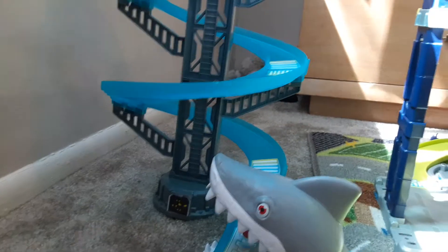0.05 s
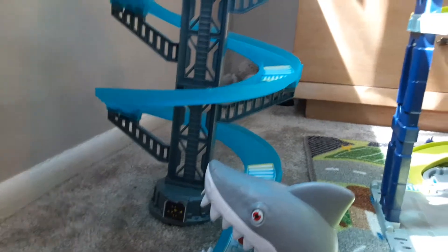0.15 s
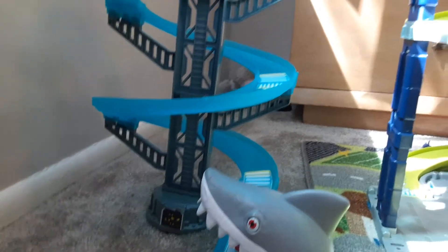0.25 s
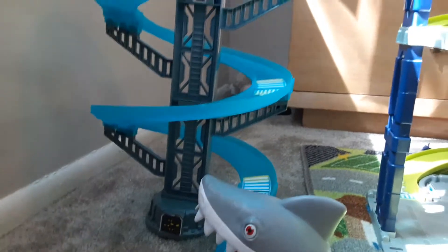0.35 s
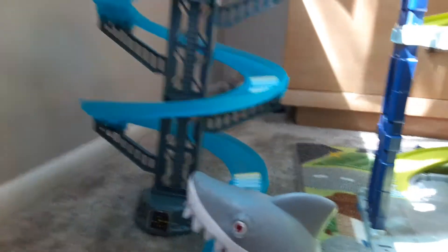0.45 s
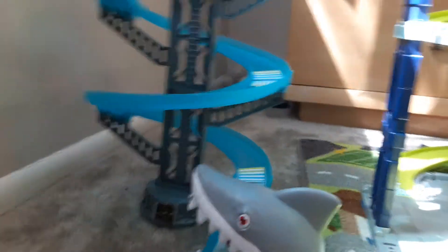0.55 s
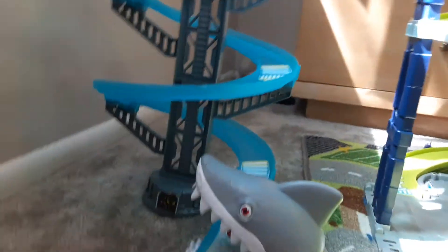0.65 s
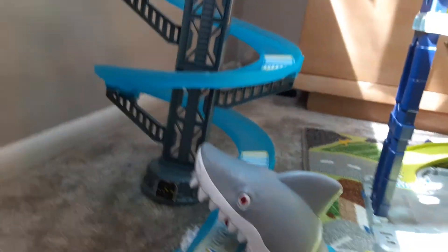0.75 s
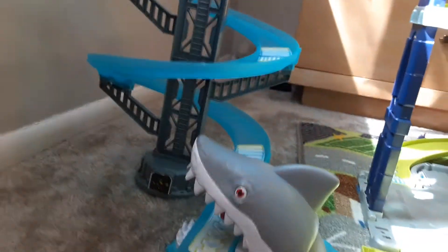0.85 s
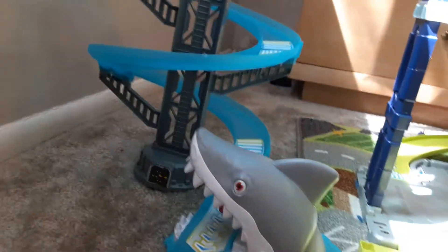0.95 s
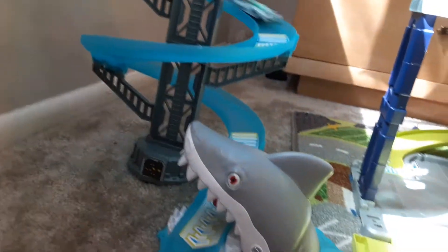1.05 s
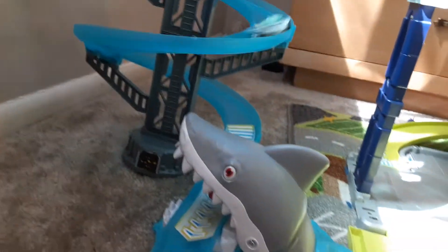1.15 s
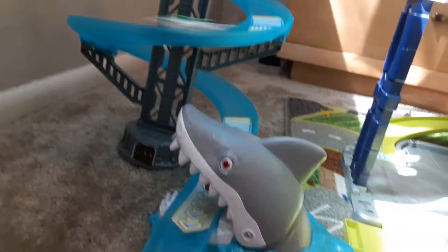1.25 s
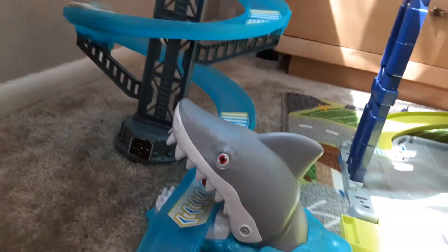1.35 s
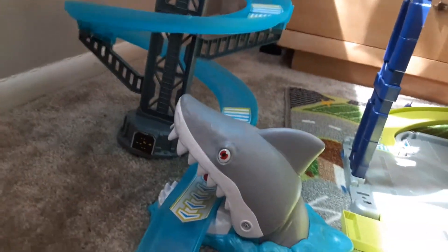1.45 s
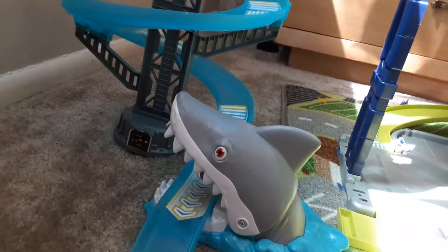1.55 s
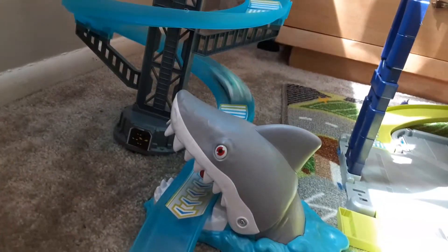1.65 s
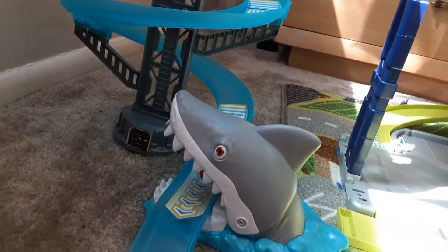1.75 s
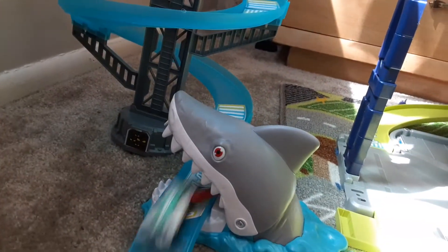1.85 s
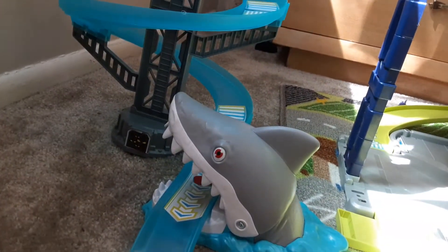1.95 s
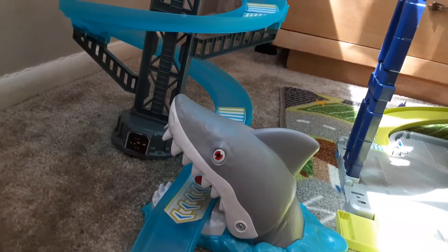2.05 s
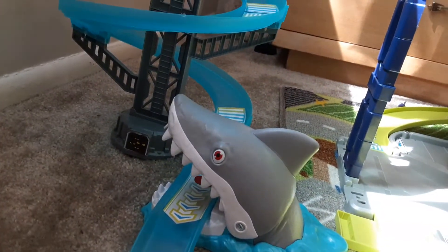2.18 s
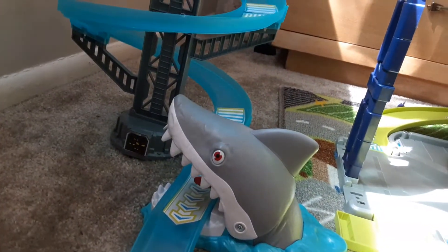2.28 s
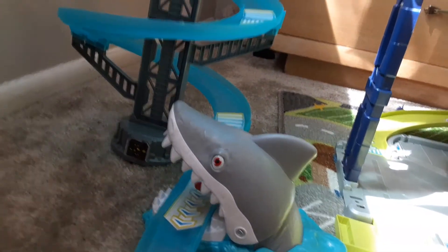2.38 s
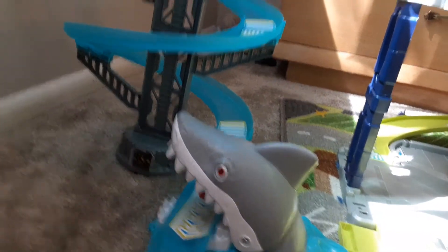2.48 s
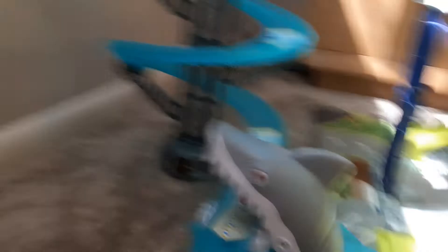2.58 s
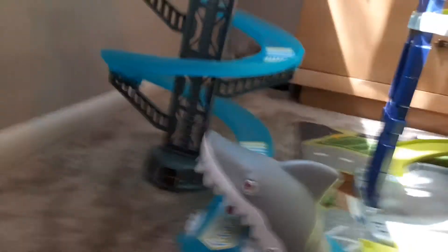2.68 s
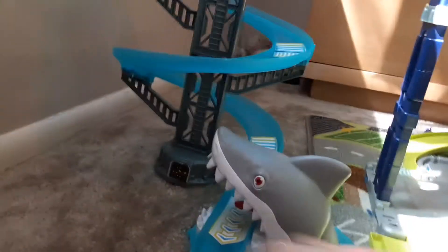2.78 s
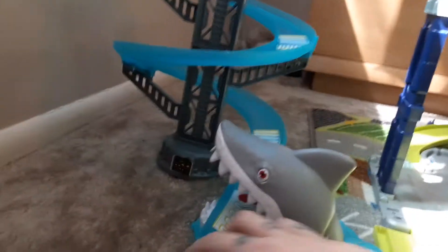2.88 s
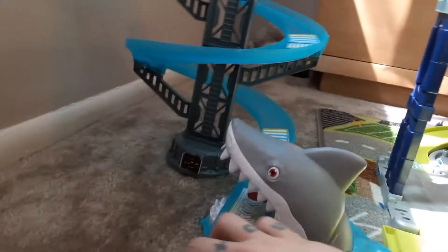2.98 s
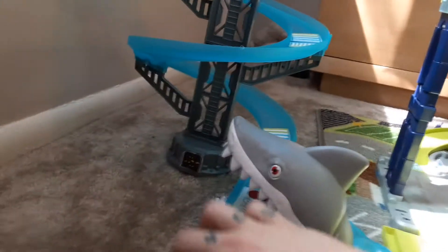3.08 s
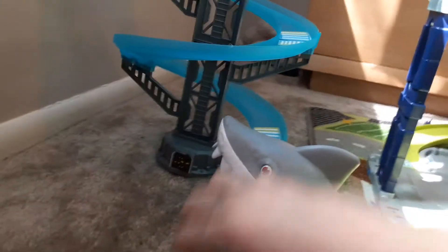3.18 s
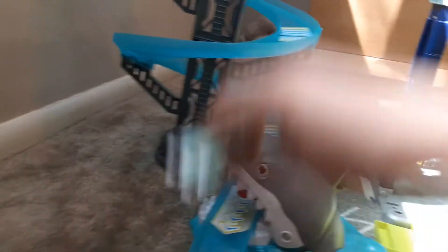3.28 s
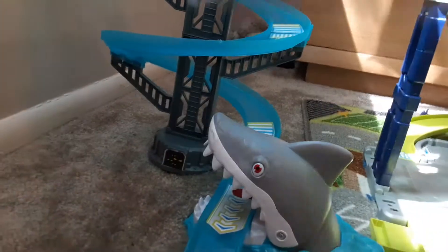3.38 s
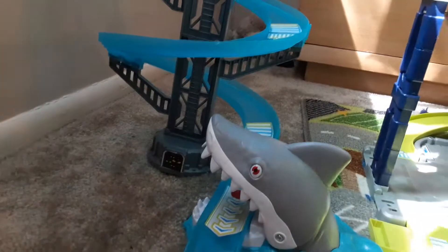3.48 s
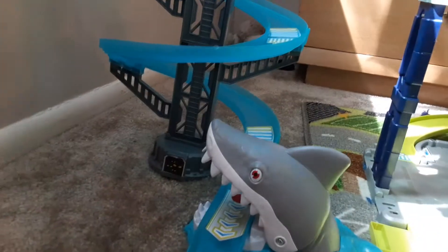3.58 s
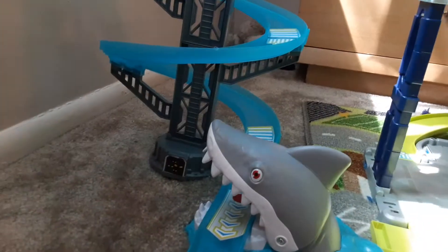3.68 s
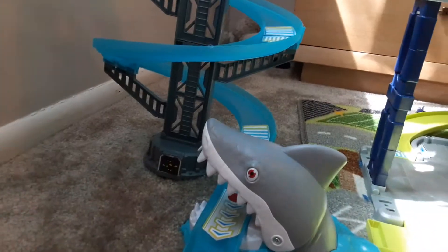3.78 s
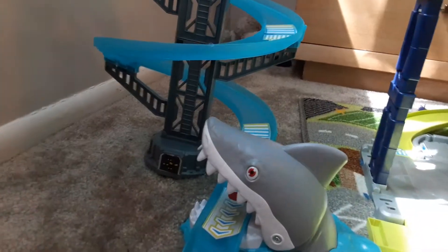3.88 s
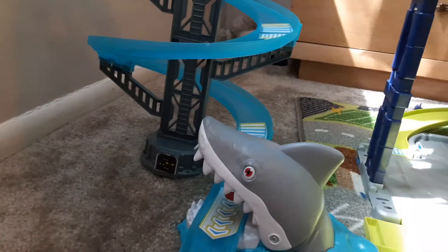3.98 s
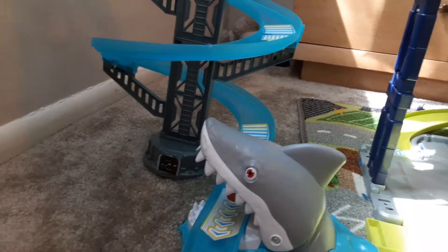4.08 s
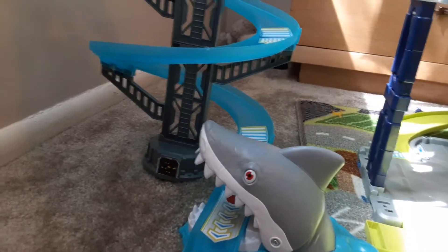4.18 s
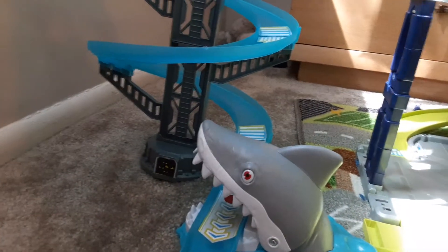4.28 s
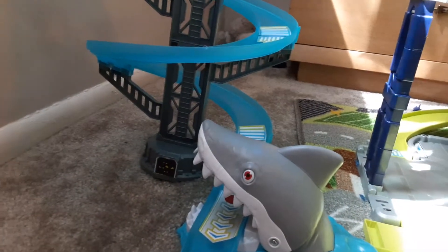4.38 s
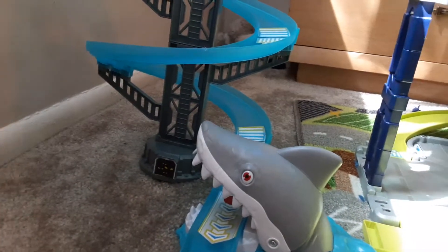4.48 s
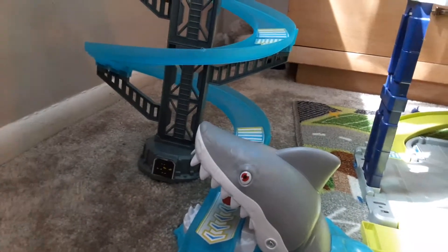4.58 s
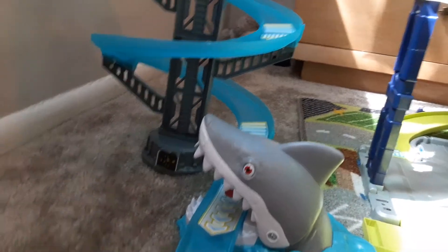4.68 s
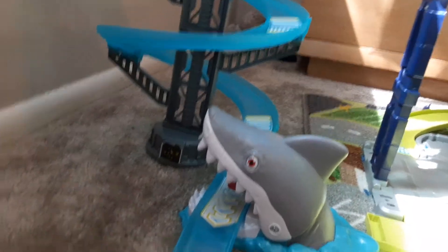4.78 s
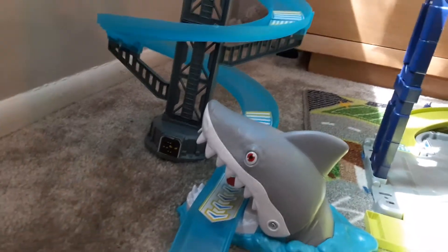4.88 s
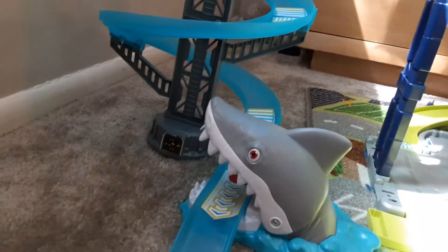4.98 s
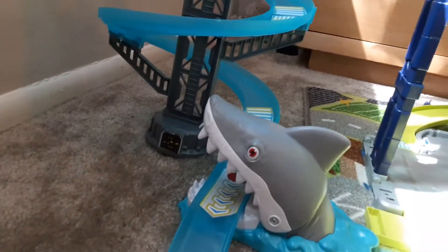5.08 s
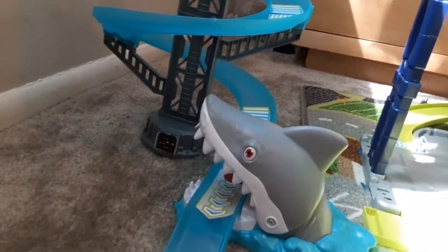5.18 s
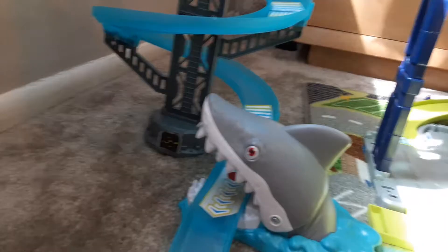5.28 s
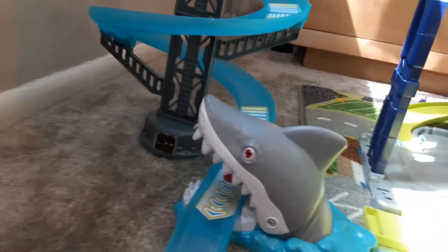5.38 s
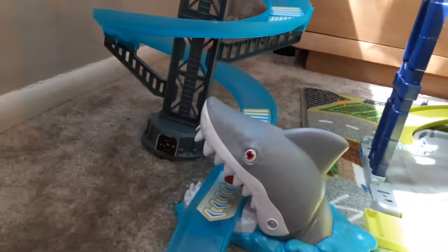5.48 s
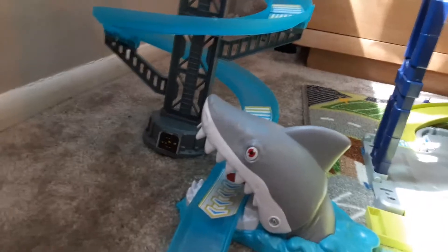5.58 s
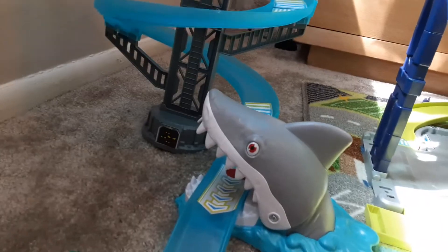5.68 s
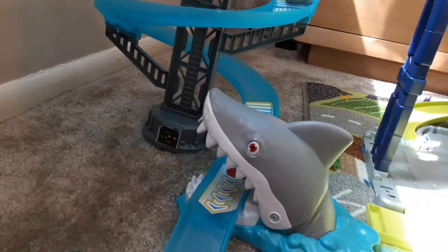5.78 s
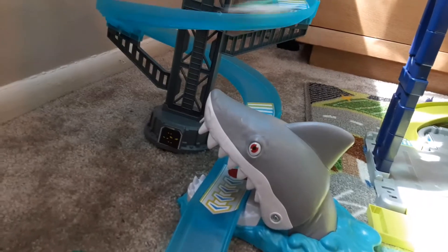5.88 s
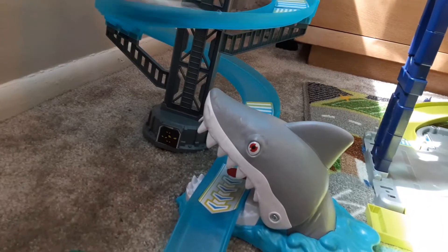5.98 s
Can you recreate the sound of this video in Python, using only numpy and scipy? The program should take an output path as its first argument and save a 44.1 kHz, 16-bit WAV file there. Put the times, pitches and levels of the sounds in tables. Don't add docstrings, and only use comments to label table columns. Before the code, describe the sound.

Gritty plastic wheel rush grows hollow, ends in a quick rattle; soft handling, sharp clicks and light nudges follow, then another rolling rush.

```python
import sys
import numpy as np
from scipy import signal
from scipy.fft import rfft, irfft, next_fast_len
from scipy.io import wavfile
from scipy.ndimage import uniform_filter1d, minimum_filter1d

SR = 44100
rng = np.random.default_rng(int(sys.argv[2]) if len(sys.argv) > 2 else 0)


def generate_wav(signal):
    frames = np.transpose(np.atleast_2d(signal))
    scaled = np.clip(frames, -1, 1) * 32767
    pcm = np.round(scaled).astype(np.int16)
    wavfile.write(sys.argv[1], SR, pcm)


def amplitude_ratio(level_db):
    exponent = np.asarray(level_db, float) / 20
    return 10 ** exponent


N = 266628
T = np.arange(N) / SR
HOP, SIZE = 128, 512

# (frequency [Hz], level [dB])
HUM_TONES = [(58.4, -0.5), (95.05, 1.5), (116.8, 0), (119.9, -4), (233.5, -15)]
# (frequency [Hz], density [dB per Hz])
RUMBLE_COLOUR = [(30, -46), (45, -21.5), (56, -1.5), (64, 8), (72, -7.5), (100, -4.5), (140, -6.5),
                 (200, -11), (300, -12), (450, -27.5), (700, -44.5)]
HUM_DB, HUM_OPEN_DB, RUMBLE_DB, RUMBLE_OPEN_DB = -55, 7, -63, 8
QUIET_DB, BUSY_DB, LINGER_S = -69.5, -29.5, 0.028

# (time [s], deepest gain [dB])
CLAMPS = [
    (1.971, -26.5),
    (3.09, -9.5),
]
CLAMP_DELAY_S = 0.25
CLAMP_LOW_HISS, CLAMP_TAILS, CLAMP_SELF, CLAMP_DRONE = 0.47, 0.29, 0.15, 0.63
# (time [s], half length [s], gain [dB])
TAIL_DUCKS = [
    (1.755, 0.025, -1.5),
    (1.968, .008, -9),
    (2.099, 0.072, 2),
    (3.135, .04, -19),
    (4.794, .01, -15),
]
WAKE_DB, WAKE_S = -16.5, 0.073

# (frequency [Hz], density [dB per Hz])
LOW_HISS_COLOUR = [(240, -33.5), (400, -5.5), (500, -4.5), (1100, -3.5), (1700, -4), (2500, -7),
                   (4500, -6.5), (6500, -23), (9000, -35.5)]
# (frequency [Hz], density [dB per Hz])
HIGH_HISS_COLOUR = [(2400, -30), (4000, -13.5), (5900, -2), (8400, -5.5), (12300, 2), (15650, -2.5),
                    (15850, -61.5)]
# (frequency [Hz], density [dB per Hz])
SELF_COLOUR = [(300, -13), (600, 6.5), (1500, -7), (5000, -11), (8500, -23.5), (12000, -7.5), (15650, -5.5),
               (15850, -47.5)]
LOW_HISS_DB, HIGH_HISS_DB, SELF_DB = -67, -72.5, -72.5
# (time [s], half length [s], dull level [dB], bright level [dB], left-right [dB])
HAND_BRUSHES = [(2.462, 0.065, -87, -60, -7), (2.588, 0.051, -75, -55.5, -8.5),
                (2.82, 0.11, -70, -63.5, -2.5), (3.027, 0.073, -60.5, -69, 2.5),
                (3.449, 0.078, -60, -56.5, 2.5), (3.744, 0.13, -62, -77, 1.5),
                (3.882, 0.061, -46.5, -54, 1.5), (4.06, 0.077, -65, -75, -1), (4.17, 0.11, -51.5, -72, 2)]

# (frequency [Hz], t60 [s])
ROOM_DECAY = [(200, 0.72), (500, 0.12), (1300, 0.22), (3500, 0.24), (9000, 0.23)]
# (frequency [Hz], likeness [0-1])
LIKENESS = [(60, .99), (170, .94), (350, .86), (520, .7), (800, .88), (1050, .35), (1400, .55), (2000, .45),
            (3000, .2), (16000, .1)]
LEAD_S = .00012
# (frequency [Hz], extra left-right [dB])
PORT_COLOUR = [(60, 1), (300, -1.5), (600, -2), (1300, -2.5), (2800, -1.3), (5000, 0.8), (10000, 1.5),
               (15000, -1.1)]
# (frequency [Hz], gain [dB])
TREBLE_EDGE = [(15800, 0), (16000, -24), (16700, -40)]

# (time [s], frequency [Hz], level [dB], t60 [s])
METAL_RINGS = [
    (1.975, 861, -64, 1.5),
    (3.852, 6697, -27, .11),
    (4.131, 2680, -26, .07),
    (4.237, 2700, -43, .05),
]
# (time [s], level [dB], t60 [s])
PART_RINGS = [(2.008, -38.5, 0.038), (4.13, -38.5, 0.16), (1.855, -37.5, .1), (5.16, -35.5, 0.22),
              (0.6, -39.5, .15)]
PART_RING_HZ = [380, 200, 15300, 160, 215]

# (time [s], blow [dB], high tick against the blow [dB], pitch of the part struck [Hz])
JOINT_KNOCKS = [(.053, -34, -2, 910), (.092, -31, -4, 2540), (1.1359, -23, 6.5, 3380),
                (4.811, -25, -10, 3000), (5.001, -19, -25, 4500), (5.2, -39, -13, 2400),
                (5.514, -16.5, -6, 3170)]
# (time [s], blow [dB], high tick against the blow [dB], pitch of the part struck [Hz])
CATCH_RATTLE = [(1.707, -15, -3, 3420), (1.712, -15, -10.5, 3000), (1.744, -15.5, -7, 3440),
                (1.7715, -14.5, -6.5, 2020), (1.7969, -10, -4.5, 2990), (1.814, -10.5, -9.5, 5550),
                (1.8252, -16, -16.5, 1940), (1.845, -17, -6.5, 1940), (1.8543, -15, -4.5, 5360),
                (1.868, -13, -18.5, 1940), (1.887, -20.5, -14, 3210), (1.9047, -15.5, -18, 4330),
                (1.917, -13, -25.5, 2920), (1.931, -8.5, -13.5, 3030), (1.9732, -16.5, 4, 3200),
                (2.0101, -26.5, -20.5, 3820)]
# (time [s], blow [dB], high tick against the blow [dB], pitch of the part struck [Hz])
HAND_KNOCKS = [(3.0869, -33.5, 1.5, 4700), (3.0964, -40, -6, 3300), (3.1835, -53, -4, 5400),
               (3.566, -50, 0, 3200), (3.7774, -22.5, -7.5, 3480), (3.788, -26, -18.5, 1500),
               (3.825, -27.5, -9, 2670), (3.8508, -9.5, -10, 2780), (3.8695, -19, -4, 6560),
               (3.91, -23, -26, 2910), (4.0006, -23, -18, 2000), (4.097, -33.5, -15.5, 2790),
               (4.113, -24.5, -14, 2620), (4.1298, -13.5, -10, 2730), (4.1404, -19, -4.5, 2320),
               (4.177, -25.5, -22, 3320)]
# (time [s], blow [dB], high tick against the blow [dB], pitch of the part struck [Hz])
TOP_NUDGES = [(4.2363, -30.5, -21, 2650), (4.274, -35, -13, 2780), (4.3194, -35, -19, 2700),
              (4.3415, -28, -12, 5350), (4.3894, -34, -18, 5420), (4.4772, -33.5, -17, 2230),
              (4.5496, -35, -19, 2910), (4.6044, -39.5, -11, 5460), (4.7144, -35, -4, 2650),
              (4.7557, -31, -18, 4700)]
# (low push [dB], length [s], shiver [dB])
KNOCK_KINDS = [
    (-13.5, 0.0027, -21),
    (-6.5, 0.0029, -20),
    (-16.5, 0.0028, -16),
    (-11.5, 0.0032, -15.5),
]
SHIVER_S, SHIVER_GRAIN_DB = .022, 1.5
# (frequency [Hz], width [Hz], level [dB])
BODY_MODES = [(2100, 74, 0), (2670, 110, 18.5), (3200, 220, -14.5), (3860, 400, -4.5), (4700, 520, -6.5),
              (5400, 150, -36)]
SETTLE_S, SETTLE_HALF_S, SETTLE_HZ, SETTLE_SHARE = 1.994, .018, 2400, .75

# (frequency [Hz], density [dB per Hz])
RUSH_COLOUR = [(88, -43.5), (150, -11), (549, -23), (792, -13), (1140, -6.5), (1440, -0.5), (1760, -4),
               (2080, 6), (2800, 3.5), (5100, 3), (8000, -20), (10400, -48.5), (17600, -120)]
# (frequency [Hz], density [dB per Hz])
FIZZ_COLOUR = [(4120, -22.5), (7000, -0.5), (7870, -1), (9260, -6.5), (12600, 2), (14200, -5), (15650, -5),
               (15850, -54)]
# (frequency [Hz], width [Hz], level [dB])
TROUGH_MODES = [(818, 75, 13), (1047, 60, 12.5)]
# (frequency [Hz], width [Hz], level [dB])
DECK_MODES = [(1497, 82, 6.5), (1294, 53, 2)]
# (time after launch [s], length [s], frequency [Hz], width [Hz], level against the rush [dB])
SINGING_STRETCHES = [(-.48, 0.15, 2750, 220, -7.5), (-0.515, 0.59, 5800, 1300, -2),
                     (0.737, 0.15, 2400, 176, -10.5), (0.019, 0.44, 3170, 150, -8),
                     (0.03, 0.13, 2180, 160, -9.5), (-0.13, 0.69, 5800, 500, -10.5),
                     (0.467, 0.084, 2750, 140, -12), (0.44, 0.5, 5200, 340, -14),
                     (0.556, 0.14, 1880, 180, -10), (0.354, 0.97, 2960, 220, -13.5),
                     (0.845, 0.28, 2850, 190, -11), (0.858, 0.22, 4860, 360, -8.5),
                     (1.2, 0.14, 3600, 160, -11), (1.143, 0.19, 750, 67, -25),
                     (1.8, 0.33, 5700, 150, -12.5), (1.395, 0.33, 3100, 320, -9),
                     (1.1, 0.21, 5100, 410, -3.5)]
LAUNCH_TIMES = [.05, 4.755]
# (time after launch [s], rush [dB], axle fizz against the rush [dB])
DESCENT_CURVE = [(.05, -38, -6), (.22, -33.5, -1), (.4, -33.5, -9.5), (.47, -34, -1.5), (0.522, -30, -10.5),
                 (.8, -32, -8), (.9, -30, -6.5), (1.1, -29.5, -8), (1.66, -28.5, -9)]
# (start [s], end [s], level [dB], change [dB], fizz [dB])
LOOSE_LEGS = [(1.715, 1.76, -34, -5, -13), (1.745, 1.79, -30.5, -12, -6.5), (1.771, 1.82, -26, -23, -7),
              (1.794, 1.952, -27.5, -4.5, -1.5), (1.93, 1.962, -27.5, -3, -15), (4.236, 4.33, -52.5, 3, -9),
              (4.29, 4.367, -46.5, 4, -7), (4.34, 4.5, -42, -9.5, -9), (4.461, 4.63, -43.5, -5.5, -8),
              (4.607, 4.778, -53, 7, -4), (4.754, 4.802, -40.5, -5.5, -12)]
HANDOVER_S, LEAVES_S = 3.0, 1.666
BUMPS_PER_S, BUMP_SPREAD_DB = 5000, 3.0
SKIP_DB, CHATTER_DB = 1.23, 2.6
BOOM_TOP_DB, BOOM_FROM_S, BOOM_DB_PER_S, BOOM_MAX_DB = -25.5, 1.05, 34.5, -1.5
DECK_FIRST_S, LAP_S, DECK_LASTS_S = 0.671, 0.607, 0.11
DECK_OFF_DB, DECK_ON_DB = -17.5, 7
PAN_DB, PAN_DB_PER_S, PAN_LAP_DB = 2.83, 0.43, 0.04


def evened(x):
    return x / np.sqrt(np.mean(x ** 2) + 1e-20)


def read(points, hz):
    f, value = np.transpose(points)
    return np.interp(np.log(hz + 1), np.log(f + 1), value)


def coloured(x, points):
    size = next_fast_len(N)
    gain = amplitude_ratio(read(points, np.fft.rfftfreq(size, 1 / SR)))
    return evened(irfft(rfft(x, size) * gain, size)[..., :N])


def band(x, lo_hz, hi_hz):
    return signal.sosfilt(signal.butter(2, [lo_hz, hi_hz], "band", fs=SR, output="sos"), x)


def modes(x, table):
    out = 0
    for k, (hz, width, db) in enumerate(table):
        r = np.exp(-np.pi * width / SR)
        pole = r * np.exp(2j * np.pi * hz / SR)
        out = out + (-1) ** k * amplitude_ratio(db) * 2 * signal.lfilter([1 - r], [1, -pole], x + 0j).real
    return out


def paired(x):
    size = next_fast_len(x.shape[1])
    z, hz = rfft(x, size), np.fft.rfftfreq(size, 1 / SR)
    same = read(LIKENESS, hz)
    late = np.exp(-2j * np.pi * hz * LEAD_S)
    right = same * late * z[0] + np.sqrt(1 - same ** 2) * z[1]
    return irfft([z[0], right], size)[:, :x.shape[1]]


def panned(x, pan_db):
    return x * amplitude_ratio(np.reshape([pan_db, -pan_db], (2, -1)) / 2)


def patchy(x, patch_db, bins, frames):
    z = signal.stft(x, nperseg=SIZE, noverlap=SIZE - HOP)[2]
    field = rng.standard_normal(z.shape[-2:][::-1]).T
    field = evened(uniform_filter1d(uniform_filter1d(field, bins, 0), frames, 1))
    return signal.istft(z * amplitude_ratio(patch_db * field), nperseg=SIZE, noverlap=SIZE - HOP)[1][..., :N]


def bell(s, half):
    return np.exp(-((T - s) / half) ** 2)


def clamp_db():
    ages = [(np.maximum(T - s, 0) / CLAMP_DELAY_S, db) for s, db in CLAMPS]
    return sum(db * (age * np.exp(1 - age)) ** 4 for age, db in ages)


def drone(busy):
    tones = evened(sum(amplitude_ratio(db) * np.sin(2 * np.pi * (hz * T + rng.random())) for hz, db in HUM_TONES))
    rumble = coloured(paired(rng.standard_normal((2, N))), RUMBLE_COLOUR)
    power = uniform_filter1d((busy ** 2).mean(0), size=1500)
    release = 1 / (LINGER_S * SR)
    power = signal.lfilter([release], [1, release - 1], power)
    level_db = minimum_filter1d(10 * np.log10(abs(power) + 1e-12), size=3500)
    level_db = uniform_filter1d(level_db, size=3000) + CLAMP_DRONE * clamp_db()
    opened = np.clip((level_db - QUIET_DB) / (BUSY_DB - QUIET_DB), -.5, 1)
    hum = tones * amplitude_ratio(HUM_DB - 1.0 + HUM_OPEN_DB * opened)
    rumble = rumble * amplitude_ratio(RUMBLE_DB + 3.5 + RUMBLE_OPEN_DB * opened + .2 * clamp_db())
    return panned(hum + rumble, 2.9)


def hiss():
    low_power = np.full((2, N), amplitude_ratio(2 * LOW_HISS_DB))
    high_power = np.full((2, N), amplitude_ratio(2 * HIGH_HISS_DB))
    for s, half, dull_db, bright_db, pan_db in HAND_BRUSHES:
        swell = panned(bell(s, half) * np.ones((2, 1)), 2 * pan_db)
        low_power = low_power + amplitude_ratio(2 * dull_db) * swell
        high_power = high_power + amplitude_ratio(2 * bright_db) * swell
    noise = paired(rng.standard_normal((2, N)))
    low = coloured(noise, LOW_HISS_COLOUR) * np.sqrt(low_power) * amplitude_ratio(CLAMP_LOW_HISS * clamp_db())
    high = coloured(noise, HIGH_HISS_COLOUR) * np.sqrt(high_power) * amplitude_ratio(clamp_db())
    steady = coloured(rng.standard_normal((2, N)), SELF_COLOUR) * amplitude_ratio(SELF_DB + CLAMP_SELF * clamp_db())
    return patchy(low + high, 1.0, bins=30, frames=10) + steady


def room(x):
    out, size = 0, 14000
    for k in range(3):
        taps = np.zeros((2, size))
        at = np.arange(140, size - 20, 20) + rng.integers(0, 20, (2, (size - 141) // 20))
        np.put_along_axis(taps, at, rng.choice([-1., 1.], at.shape), 1)
        hz, t, z = signal.stft(paired(taps), SR, nperseg=256)
        decay = amplitude_ratio(-60 * t / read(ROOM_DECAY, hz)[:, None])
        tail = signal.istft(z * decay, SR, nperseg=256)[1]
        turn = np.sqrt(2 / 3) * np.cos(np.pi * (3 * T + k / 3))
        out = out + signal.oaconvolve((x * turn)[None], tail / np.linalg.norm(tail[0]), axes=1)[:, :N]
    return out


def rings():
    out, age = np.zeros(N + SR), np.arange(SR) / SR
    parts = [(s, hz, db, t60) for hz, (s, db, t60) in zip(PART_RING_HZ, PART_RINGS)]
    for s, hz, db, t60 in METAL_RINGS + parts:
        onset = np.minimum(age / 0.0035, 1)
        out[round(s * SR):][:SR] += amplitude_ratio(db - 60 * age / t60) * np.sin(2 * np.pi * hz * age) * onset
    return panned(out[:N] * np.ones((2, 1)), 3.0)


def knocks():
    force, low, high, part = np.zeros((4, 2, N))
    t = np.arange(5000) / SR
    families = (JOINT_KNOCKS, CATCH_RATTLE, HAND_KNOCKS, TOP_NUDGES)
    rows = [(*row, *kind) for table, kind in zip(families, KNOCK_KINDS) for row in table]
    for s, db, high_db, hz, low_db, length, shiver_db in rows:
        grain = evened(uniform_filter1d(rng.standard_normal(len(t)), size=120))
        shiver = amplitude_ratio(shiver_db + SHIVER_GRAIN_DB * grain) * np.exp(-t / SHIVER_S)
        envelope = (np.exp(-t / length) + shiver) * np.minimum(5.9 * t / length, 1)
        burst = rng.standard_normal((2, len(t))) * envelope * amplitude_ratio(db)
        at = slice(round(s * SR), round(s * SR) + len(t))
        force[:, at] += burst
        low[:, at] += burst * amplitude_ratio(low_db)
        high[:, at] += burst * amplitude_ratio(high_db)
        part[:, at] += modes(burst, [(hz, 420, 0)])
    body = 0.53 * modes(force, BODY_MODES) + 1.4 * band(force, 1500, 5000) + 2.0 * part
    push, tick = 2.8 * band(low, 590, 2000), 1.02 * band(high, 6500, 16500)
    return panned(paired(body + push - tick), 2.3)


def singing(drive):
    out = np.zeros((2, N))
    for launch in LAUNCH_TIMES:
        for s, lasts, hz, width, db in SINGING_STRETCHES:
            at = slice(round((launch + s) * SR), round((launch + s + lasts) * SR))
            if 0 <= at.start < N:
                fade = signal.windows.tukey(at.stop - at.start, .6)[:N - at.start]
                out[:, at] += amplitude_ratio(db) * fade * evened(modes(drive[:, at], [(hz, width, 0)]))
    return out


def car_motion():
    age = T - np.where(T < HANDOVER_S, *LAUNCH_TIMES)
    s, level_db, fizz_db = np.transpose(DESCENT_CURVE)
    rush_db = np.interp(age, s, level_db) + WAKE_DB * np.exp(-T / WAKE_S)
    off_spiral = (age > LEAVES_S) | (T > HANDOVER_S) & (age < s[0])
    rush_db = np.where(off_spiral, -110, rush_db)
    fizz_db, skip_db = np.interp(age, s, fizz_db), np.full(N, SKIP_DB)
    for start, end, db, change_db, leg_fizz_db in LOOSE_LEGS:
        on = (T >= start) & (T < end)
        rush_db = np.where(on, db + change_db * (T - start) / (end - start), rush_db)
        fizz_db = np.where(on, leg_fizz_db, fizz_db)
        skip_db = np.where(on, CHATTER_DB, skip_db)
    boom_db = np.minimum(BOOM_TOP_DB + BOOM_DB_PER_S * np.maximum(age - BOOM_FROM_S, 0), BOOM_MAX_DB)
    lap = (age - DECK_FIRST_S) / LAP_S
    from_deck_s = (lap - np.maximum(np.round(lap), 0)) * LAP_S
    deck_db = DECK_OFF_DB + (DECK_ON_DB - DECK_OFF_DB) * np.exp(-(from_deck_s / DECK_LASTS_S) ** 2)
    pan_db = PAN_DB + PAN_DB_PER_S * np.maximum(age, 0) + PAN_LAP_DB * np.cos(2 * np.pi * lap)
    return uniform_filter1d(amplitude_ratio(rush_db), size=60), boom_db, deck_db, fizz_db, pan_db, skip_db


def rolling():
    rush, boom_db, deck_db, fizz_db, pan_db, skip_db = car_motion()
    bumps = amplitude_ratio(BUMP_SPREAD_DB * np.minimum(rng.exponential(1, (2, N)), 3))
    bumps = bumps * (rng.random((2, N)) < BUMPS_PER_S / SR)
    bumps = evened(bumps * rng.choice([-1., 1.], (2, N)))
    drive = paired(.55 * bumps + .83 * rng.standard_normal((2, N)))
    wobble = uniform_filter1d(uniform_filter1d(rng.standard_normal(N), size=250), size=250)
    drive = drive * amplitude_ratio(skip_db * evened(wobble))
    sound = coloured(drive, RUSH_COLOUR) + amplitude_ratio(fizz_db) * coloured(drive, FIZZ_COLOUR)
    sound = sound + amplitude_ratio(boom_db - 6.0) * evened(modes(drive, TROUGH_MODES))
    sound = sound + amplitude_ratio(deck_db - 14.5) * evened(modes(drive, DECK_MODES))
    sound = patchy(sound + singing(drive), 1.3, bins=3, frames=30)
    return panned(sound * rush * amplitude_ratio(0.5), pan_db)


def scene():
    roll, knock = rolling(), knocks()
    gate_db = CLAMP_TAILS * clamp_db() + sum(db * bell(s, half) for s, half, db in TAIL_DUCKS)
    send = (amplitude_ratio(-7.5) * roll + amplitude_ratio(-4.0) * knock).mean(0)
    tails = panned(room(send), 5.8) * amplitude_ratio(gate_db)
    low_ring = signal.sosfiltfilt(signal.butter(3, SETTLE_HZ, fs=SR, output="sos"), knock + tails)
    damped = SETTLE_SHARE * bell(SETTLE_S, SETTLE_HALF_S) * low_ring
    busy = roll + knock + tails - damped + hiss()
    return busy + rings() + drone(busy)


def roll_off(x):
    return signal.sosfilt(signal.butter(12, 16850, fs=SR, output="sos"), x)


def record(dry):
    size = next_fast_len(N)
    hz = np.fft.rfftfreq(size, 1 / SR)
    spectrum = panned(rfft(dry, size), read(PORT_COLOUR, hz)) * amplitude_ratio(read(TREBLE_EDGE, hz))
    ports = irfft(spectrum, size)[:, :N]
    mix = signal.sosfilt(signal.butter(3, 37, "high", fs=SR, output="sos"), ports)
    return roll_off(mix)


dry = scene()
out = record(dry)
generate_wav(out)
```